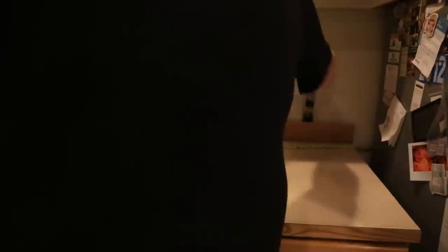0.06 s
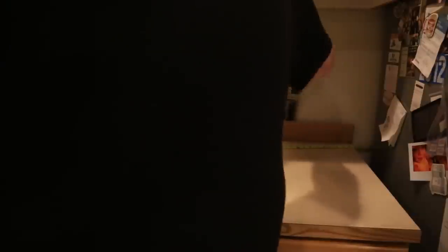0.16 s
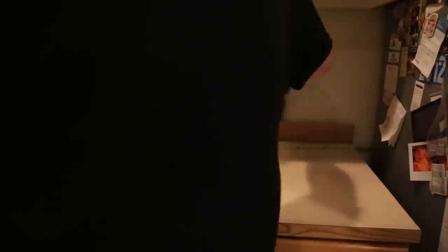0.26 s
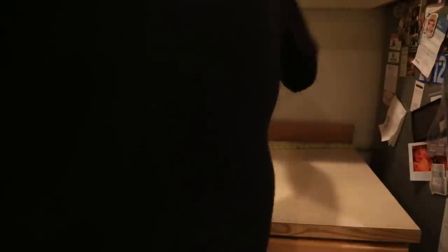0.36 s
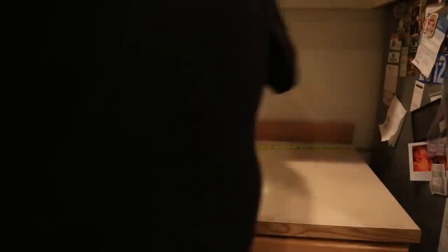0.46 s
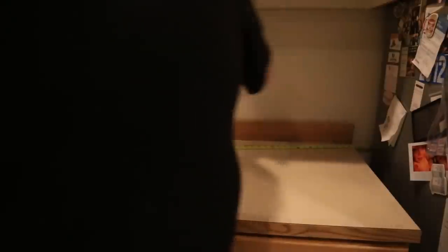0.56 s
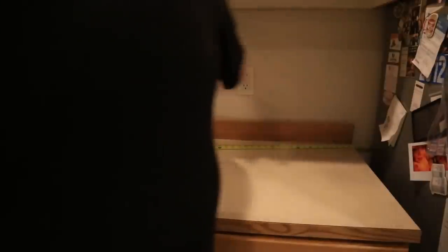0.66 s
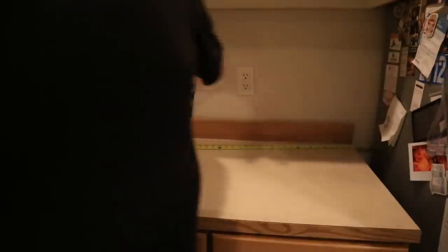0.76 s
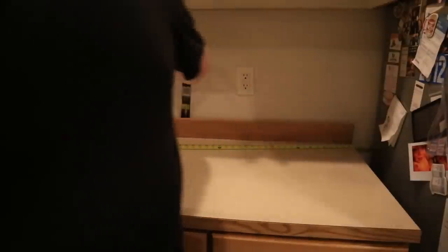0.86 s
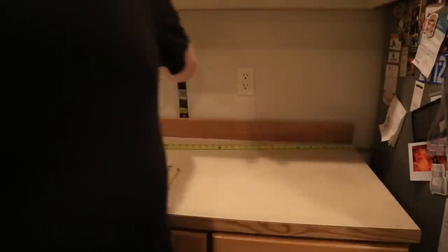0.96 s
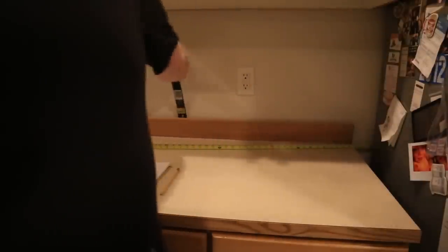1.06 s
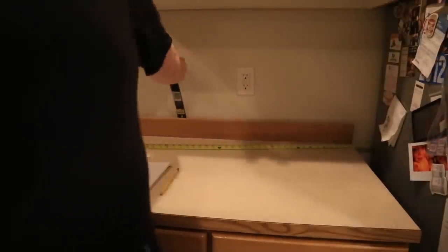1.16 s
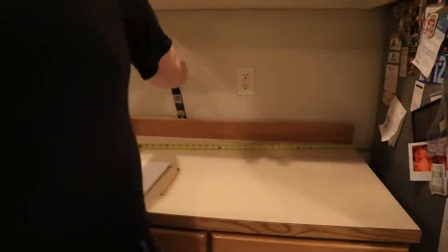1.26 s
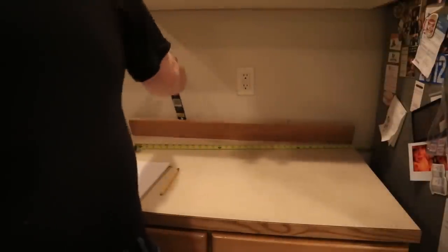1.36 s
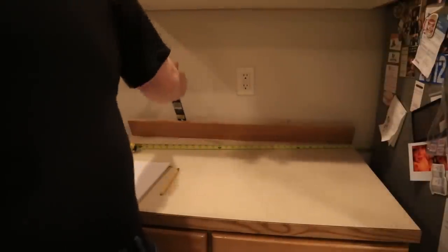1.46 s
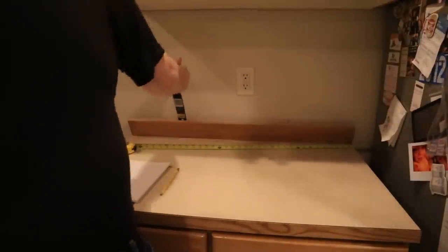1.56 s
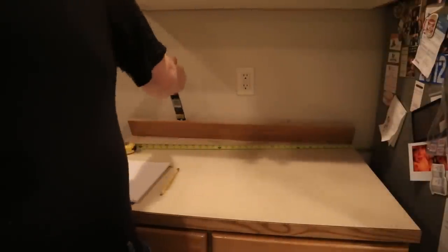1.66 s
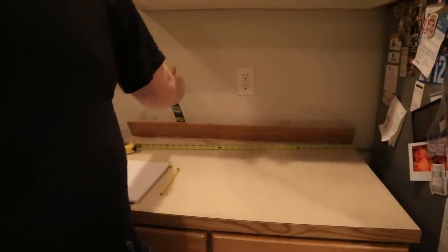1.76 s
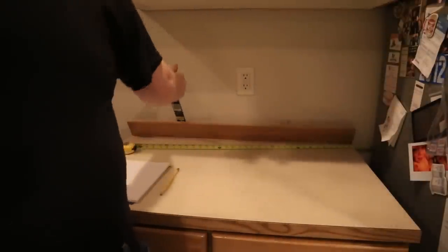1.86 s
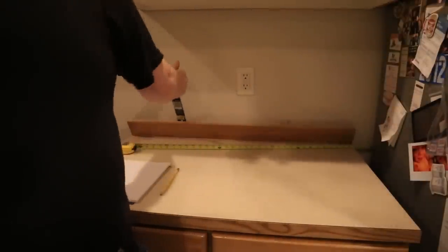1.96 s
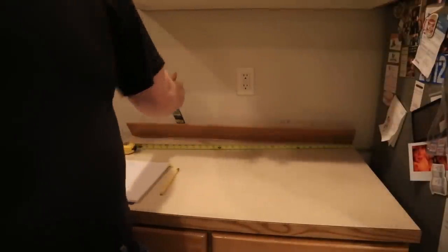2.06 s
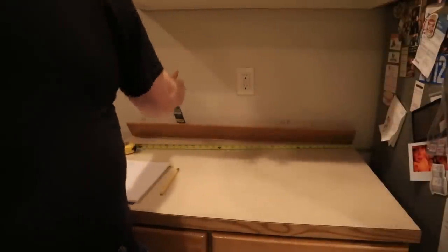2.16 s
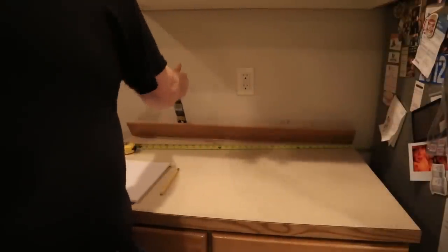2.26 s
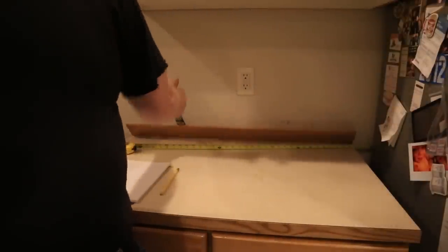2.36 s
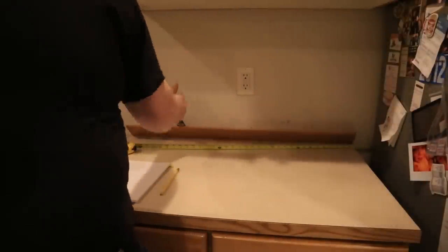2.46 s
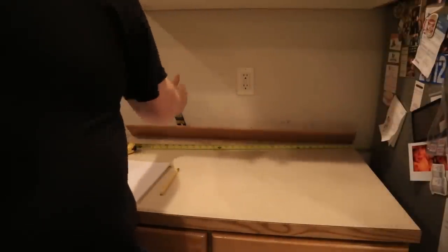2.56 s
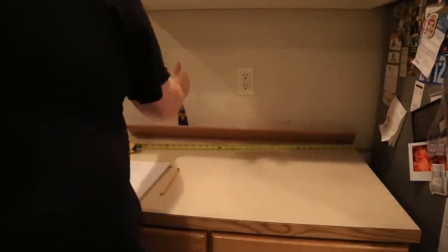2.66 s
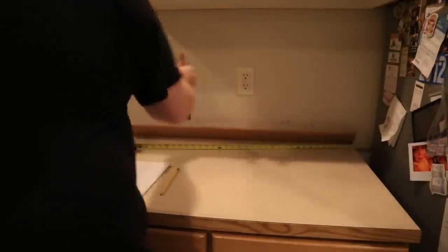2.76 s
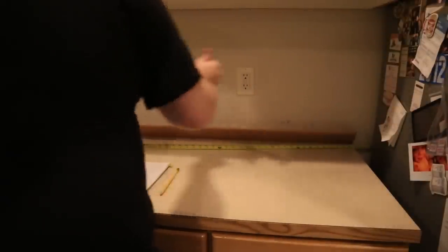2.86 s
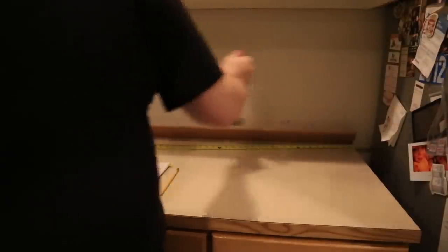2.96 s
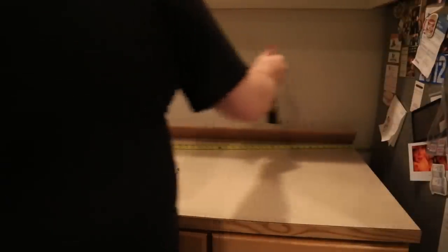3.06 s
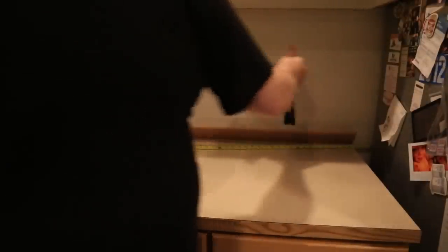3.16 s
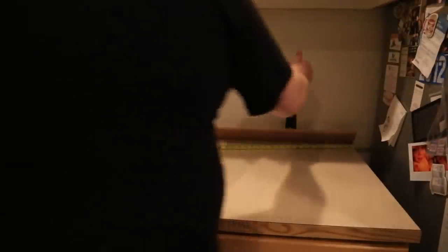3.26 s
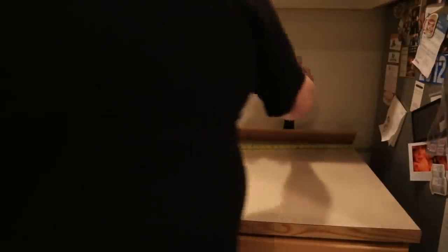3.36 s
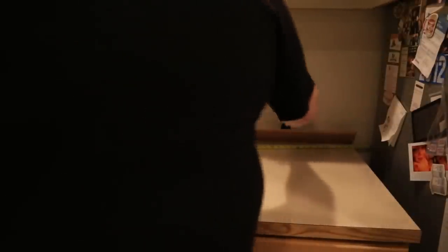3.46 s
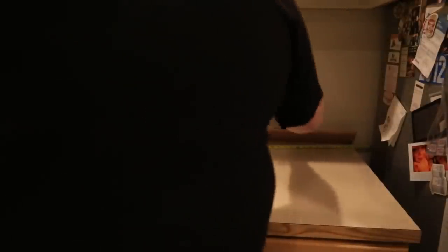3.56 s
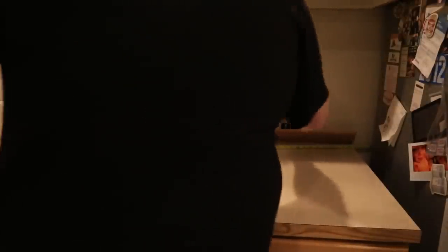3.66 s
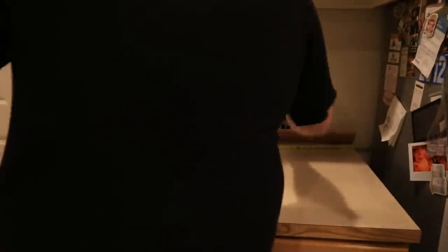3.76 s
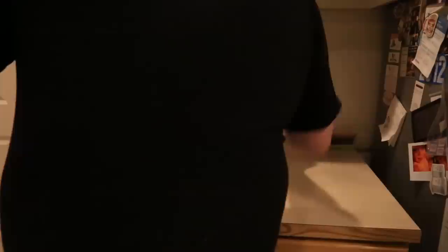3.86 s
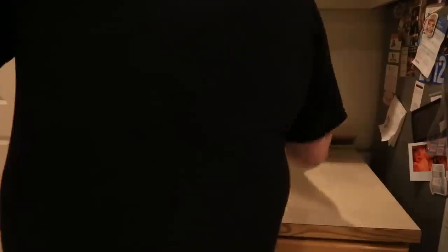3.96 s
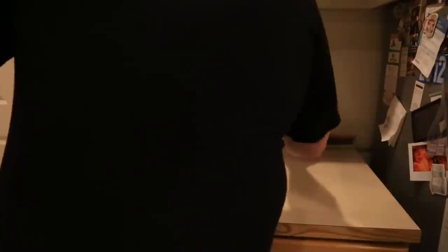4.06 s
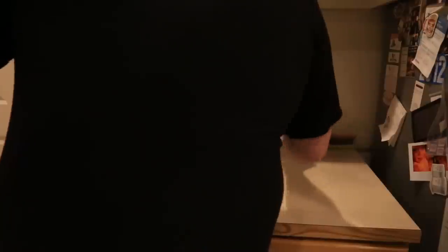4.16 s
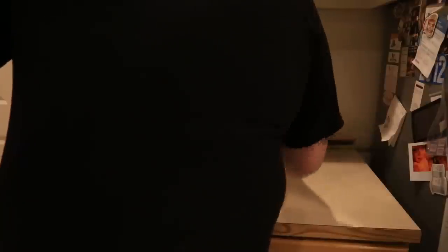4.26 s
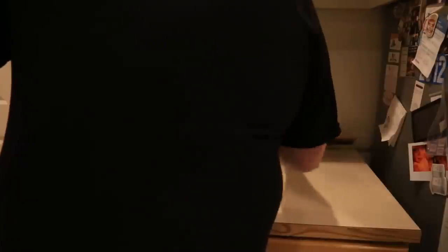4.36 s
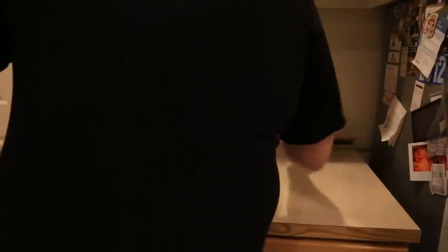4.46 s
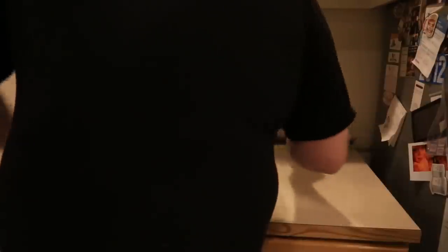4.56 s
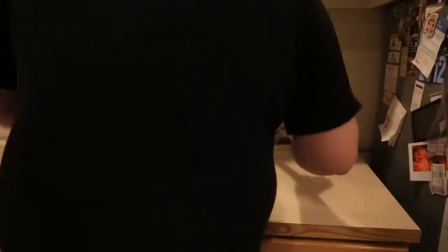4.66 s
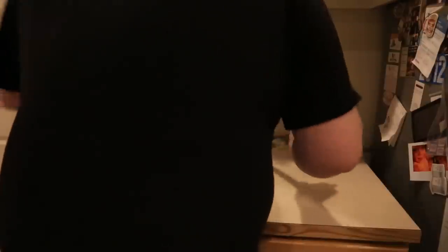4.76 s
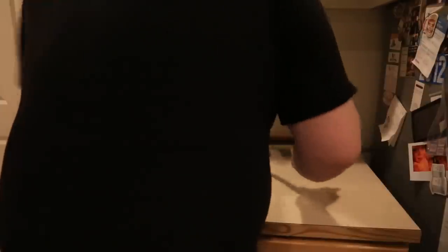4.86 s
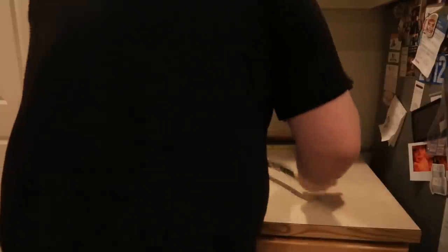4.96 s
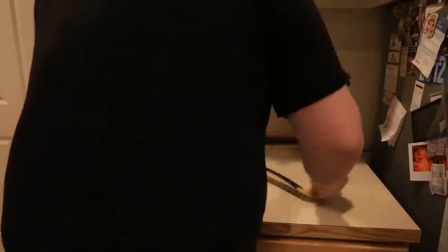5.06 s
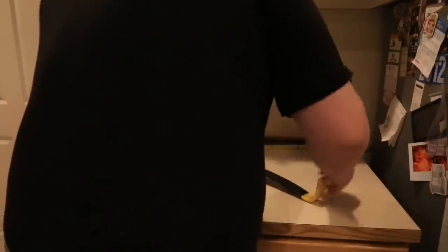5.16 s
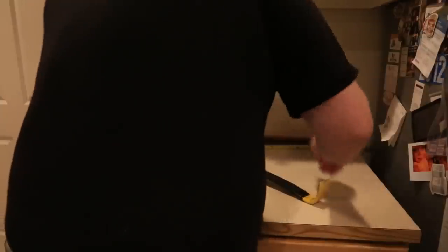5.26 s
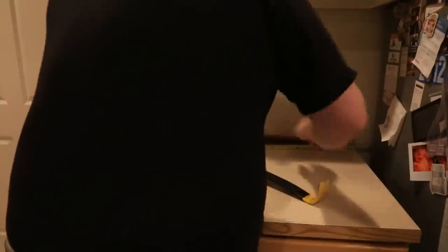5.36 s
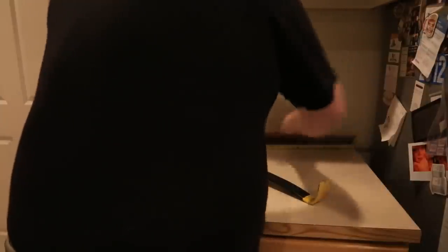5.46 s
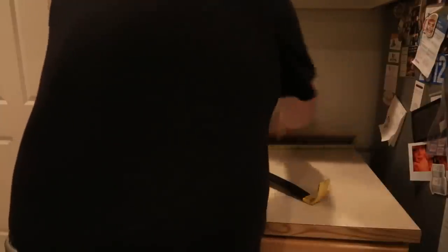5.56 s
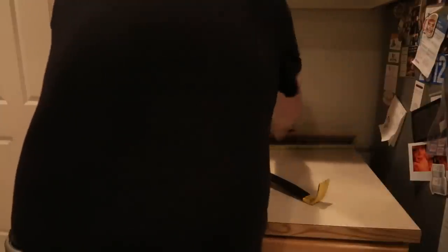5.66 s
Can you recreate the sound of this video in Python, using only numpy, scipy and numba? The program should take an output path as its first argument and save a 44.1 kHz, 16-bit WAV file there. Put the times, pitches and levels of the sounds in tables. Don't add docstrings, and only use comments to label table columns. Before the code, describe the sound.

Close, dry and rough: dull woody knocks with hollow wall thumps and short gritty scrapes, then sudden hard metal-on-wood cracks that buzz briefly around the middle pitches. After a few more pries, one tool thuds on the counter, and another lands with a loud ringing clank and quick rebounds. Small room, short echo, faint hum and rumble, camera nearby, loud peaks clipping.

```python
import sys
import numpy as np
from scipy import signal
from scipy.fft import rfft, irfft, next_fast_len
from scipy.io import wavfile
from scipy.ndimage import uniform_filter1d
from numba import njit

SR = 44100
rng = np.random.default_rng(int(sys.argv[2]) if len(sys.argv) > 2 else 0)


def boost(x):
    u = np.asarray(x, float) / 20
    return 10 ** u


def store_wav(level_fs):
    pcm = np.round(np.clip(np.atleast_2d(level_fs), -1, 1) * 32767)
    wavfile.write(sys.argv[1], SR, pcm.T.astype(np.int16))


N = 251811


def unit(x):
    return x / np.sqrt(np.mean(x ** 2))


def band(x, lo_hz, hi_hz):
    return signal.sosfilt(signal.butter(2, [lo_hz, min(hi_hz, .45 * SR)], "band", fs=SR, output="sos"), x)


def smooth_noise(size, window, passes=1):
    x = rng.standard_normal(size)
    for _ in range(passes):
        x = uniform_filter1d(x, window)
    return unit(x)


def fade(t60, length):
    t = np.arange(int(length * SR)) / SR
    return t, np.exp(-np.log(1000) * t / t60)


@njit
def modes(pole, gain, size):
    out = np.zeros(size)
    for k in range(len(pole)):
        z = gain[k] + 0j
        for i in range(size):
            out[i] += z.imag
            z *= pole[k]
    return out


def ring(hz, gain, t60, rise):
    size = int(min(max(t60), .6) * SR)
    x = modes(np.exp((2j * np.pi * hz - np.log(1000) / t60) / SR), gain, size)
    x = x * (1 - np.exp(-np.arange(size) / SR / rise))
    return x / np.abs(x).max()


def add(out, s, x):
    i = int(s * SR)
    out[i:i + len(x)] += x[:N - i]


def floor():
    # pitch in Hz, level in dB per Hz.
    background = [(56, -29.5), (95, -5.5), (108, 1.5), (320, -11.5), (388, -7), (441, -16.5), (594, -16.5),
                  (950, -24.5), (1520, -24), (1920, -29), (15500, -38.5)]
    size = next_fast_len(N)
    f = np.maximum(np.fft.rfftfreq(size, 1 / SR), 1)
    hz, db = np.transpose(background)
    colour = boost(np.interp(np.log(f), np.log(hz), db))
    apart = np.clip(f / 5500, 0, 1.05)
    noise = rfft(rng.standard_normal((2, size)))
    mid, side = irfft(noise * [colour, colour * apart], size)[:, :N]
    gain = boost(-48.5) / np.sqrt(np.mean(mid ** 2))
    flutter = boost(1.2 * smooth_noise(N, 6000))
    hum = boost(-41) * np.sin(2 * np.pi * 59.8 * np.arange(N) / SR)
    return gain * (mid * flutter + side * np.array([[1], [-1]])) + hum


def room(x):
    # middle pitch in Hz, t60 in seconds, level in dB.
    tail_bands = [(125, 0.33, -9.5), (480, 0.33, -10), (1500, 0.24, -4.5), (3930, 0.24, -6.5),
                  (10510, 0.18, -1)]
    tail = np.zeros((2, int(.45 * SR)))
    for hz, t60, db in tail_bands:
        t, decay = fade(t60, .45)
        part = band(rng.standard_normal(tail.shape), hz / 1.675, hz * 1.7) * decay * (1 - np.exp(-t / 0.004))
        tail += boost(db) * part * np.sqrt(14 / t60 / SR)
    mid, other = signal.oaconvolve(x[None], tail, axes=1)[:, :N]
    side = 0.12 * np.diff(other, prepend=0)
    return np.array([mid + side, mid - side])


def thumps():
    # start in seconds, peak in dB, pitch in Hz.
    wall = [(0.131, -24.5, 141), (0.183, -10.5, 159.5), (0.395, -25.5, 169), (0.725, -15, 147.7),
            (0.796, -14, 126), (0.87, -21, 139.5), (0.994, -15, 125), (1.204, -30.5, 116.6),
            (1.255, -33.5, 151), (1.58, -16.5, 140.2), (1.629, -34, 139), (1.77, -20, 125),
            (2.08, -14.5, 128.8), (2.121, -35, 127), (2.217, -19.5, 136.4), (2.401, -21, 117.4),
            (2.46, -31, 106.5), (2.539, -27, 125), (2.569, -29, 138), (3.559, -7.5, 121.6),
            (3.586, -38, 136), (3.915, -16.5, 117.4), (3.962, -33, 132), (4.25, -15, 135),
            (4.391, -15, 130.6)]
    # start in seconds, peak in dB, pitch in Hz.
    cabinet = [
        (4.752, -6.5, 112),
        (4.843, -7.5, 119.2),
        (4.938, -18.5, 186.7),
        (5.147, -22, 140.6),
        (5.198, -11, 120.1),
        (5.261, -13.5, 115),
        (5.302, -18, 118.5),
        (5.328, -21, 103),
    ]
    out = np.zeros(N)
    for s, db, hz, t60 in [(*row, 0.13) for row in wall] + [(*row, 0.12) for row in cabinet]:
        c = rng.random((2, 4))
        ratio = np.append(1, np.array([.8, 1.25, 1.6, 2.1]) * (.93 + .14 * c[0]))
        decay = t60 * np.array([0.77, 1.2, 1.35, 1.18, 1.02])
        add(out, s, boost(db + 2.5) * ring(hz * ratio, np.append(1, 0.35 * c[1]), decay, 0.014))
    return out


def scrapes():
    # pitch in Hz, width in Hz, level in dB.
    rub = [(1049, 134, 8.5), (1410, 76, -1.5), (1634, 4.9, -8.5), (1865, 137, -5), (2936, 44, -4),
           (3213, 65, -7.5), (3760, 300, -5.5)]
    # start in seconds, length in seconds,
    # level at start in dB, level at end in dB, grit in dB (a higher value adds more grit, mixed in upside
    drags = [(0.039, 0.11, -53.5, -31, -8.5), (0.124, .055, -30, -31, -19), (0.792, 0.079, -33, -25.5, -38),
             (0.842, 0.17, -37.5, -22.5, -17), (1.141, 0.12, -48, -52.5, -7), (1.268, 0.23, -41, -38, -7.5),
             (1.541, 0.032, -61, -30, -3.5), (2.011, 0.054, -54, -54, -3.5),
             (2.622, 0.064, -59.5, -28.5, -31), (3.746, 0.13, -55.5, -50.5, -10),
             (4.148, 0.058, -53, -57, -17), (4.422, 0.056, -36.5, -26.5, -17),
             (4.597, 0.15, -54.5, -51.5, -10.5), (4.861, 0.1, -20.5, -25.5, -17),
             (5.1, 0.093, -52.5, -30, -12.5), (5.453, 0.057, -44, -37, -28)]
    # start in seconds, level in dB, t60 in seconds, grit in dB, rumble in dB.
    settles = [(.2, -34.5, 0.51, -10, 8.5), (0.407, -19.5, 0.28, -12.5, -0.5), (1.006, -30, 0.31, -25.5, 5),
               (1.575, -28.5, 0.19, -27.5, 5.5), (1.82, -33.5, 0.506, -15, -3.5),
               (2.13, -33.5, 0.52, -18, 0.5), (2.42, -37, 0.57, -6.5, 5), (2.694, -18.5, 0.057, -18, -14.5),
               (3.556, -18, 0.23, -19, 10.5), (3.97, -18, 0.28, -8.5, -5.5), (4.272, -23.5, 0.28, 0, -1),
               (4.475, -32, 0.31, -15, -3.5), (4.78, -15, .14, -18, 7), (4.959, -26.5, 0.36, -32, 9.5),
               (5.215, -11.5, 0.46, -12, 4.5), (5.35, -19.5, 0.2, -13.5, 5.5), (5.505, -45, 0.096, -35, -2),
               (5.594, -49, 0.16, -25, -1)]
    # start in seconds, length in seconds, level in dB, pitch in Hz, width in Hz.
    rasps = [(0.85, 0.074, -42.5, 3160, 400), (0.848, 0.08, -48, 4700, 900),
             (1.275, 0.26, -47.5, 1073, 120.4), (1.282, 0.11, -45, 1656, 150),
             (1.285, 0.22, -48.5, 3110, 295), (1.32, 0.13, -54.5, 3950, 400),
             (4.267, 0.073, -43, 4660, 910), (4.87, 0.18, -28, 436, 200), (5.05, 0.37, -37, 414, 160),
             (4.892, 0.085, -40, 2830, 600), (5.471, 0.067, -41, 1080, 300), (5.576, .05, -47.5, 1004, 297),
             (0.862, 0.23, -46.5, 1500, 200), (2.429, 0.053, -49, 9920, 8940),
             (2.642, 0.071, -36, 1130, 498), (3.933, 0.04, -52.5, 11900, 7000),
             (4.278, 0.063, -48, 12000, 7000), (4.6, .13, -57.5, 1160, 198), (4.76, 0.043, -17, 354, 149),
             (4.917, .11, -23, 185, 50), (4.843, 0.063, -19, 318, 100)]

    jerks = boost(1.78 * rng.exponential(size=N // 8 + 1)).repeat(8)[:N]
    slips = rng.standard_normal(N) * jerks
    patchy = boost(1.4 * smooth_noise(N, 400))
    body = 1.54 * slips
    for hz, width, db in rub:
        body = body + boost(db) * band(slips, hz - 1.8 * width, hz + 2.0 * width) * np.sqrt(600 / width)
    mid = unit(band(body, 1097, 2450))
    grit = unit(band(slips + .25 * body, 1830, 5700) + 0.098 * band(slips, 3000, 10500))
    rumble = unit(band(slips, 213, 381) + 0.81 * band(slips, 320, 536))

    moves = [(*row, -2) for row in drags]
    for s, db, t60, grit_db, rumble_db in settles:
        moves.append((s, t60, db, db - 60, grit_db, rumble_db))
    out = np.zeros(N)
    for s, length, start_db, end_db, grit_db, rumble_db in moves:
        i = np.arange(int(s * SR), min(int((s + length) * SR), N))
        t = i / SR - s
        edge = np.clip(np.minimum(t, length - t) / 0.0037, 0, 1)
        mix = mid[i] - boost(grit_db) * grit[i] + boost(rumble_db) * rumble[i]
        out[i] += edge * boost(start_db + (end_db - start_db) * t / length - 5.0) * mix

    t = np.arange(N) / SR
    for s, length, db, hz, width in rasps:
        edge = np.clip(np.minimum(t - s, s + length - t) / 0.02, 0, 1)
        out += boost(db) * edge * unit(band(slips, hz - width / 2, hz + width / 2))
    return out * patchy


def rattles():
    # start in seconds, level in dB, pitch in Hz, width in Hz, t60 in seconds.
    smears = [(1.799, -30, 5600, 200, .3), (1.799, -37, 4870, 160, .3), (1.8, -42, 6400, 200, .25),
              (1.797, -42, 7150, 200, .1), (.997, -28, 1500, 170, .25), (1.0, -33, 2000, 150, .12),
              (1.794, -44, 12500, 6000, .05), (2.107, -42, 12000, 7000, .07), (2.11, -36, 6000, 1800, .2),
              (2.452, -40, 6200, 3000, .13), (3.546, -29, 2050, 450, .3), (4.25, -17, 1550, 500, .13),
              (1.31, -58, 11000, 4000, .3)]
    out, noise = np.zeros(N), rng.standard_normal(SR)
    for s, db, hz, width, t60 in smears:
        t, decay = fade(t60, t60)
        tone = unit(band(noise, hz - width / 2, hz + width / 2))[-len(t):]
        add(out, s, boost(db) * tone * decay * (1 - np.exp(-t / 0.0027)))
    return out


def sings():
    # start in seconds, length in seconds, level in dB.
    free_spells = [(4.006, 0.017, -21), (4.032, 0.011, -21.5), (4.077, 0.025, -29.5), (4.162, .036, -41.5),
                   (4.865, .08, -59.5), (4.938, 0.12, -47.5), (4.974, .025, -50), (4.989, 0.043, -40.5),
                   (5.085, .1, -59.5), (5.13, .06, -59), (5.13, .06, -56), (5.21, 0.084, -37),
                   (5.218, 0.041, -19), (5.222, .078, -21.5), (5.222, .04, -24), (5.265, .11, -33.5),
                   (5.268, .045, -19.5), (5.27, .022, -31.5), (5.291, .04, -48.5), (5.341, 0.077, -24.5),
                   (5.343, 0.046, -25), (5.36, .035, -51), (5.301, .075, -8.5), (5.43, 0.037, -45.5),
                   (1.795, 0.012, -5.5), (2.34, 0.039, -47), (5.59, 0.092, -64), (2.121, 0.019, -4.5),
                   (2.181, 0.067, -39), (2.201, 0.029, -28.5), (2.269, 0.055, -38), (4.76, 0.245, -51.5),
                   (5.199, 0.055, -37.5), (5.222, .075, -46), (5.233, .027, -41.5), (5.211, 0.08, -60.5),
                   (5.269, .06, -41.5), (5.31, 0.097, -56), (5.374, 0.083, -53), (5.44, 0.15, -48),
                   (5.63, 0.046, -58.5), (5.226, .09, -57), (5.21, .1, -59.5), (5.299, 0.086, -57),
                   (4.995, .02, -54), (4.767, .06, -51), (5.141, .05, -56), (.93, .05, -58),
                   (4.46, .06, -56)]
    sing_hz = [1017, 1017, 1017, 1017, 6370, 3558, 5367, 1857, 5100, 3967, 2132, 8096, 6379, 2896, 5122,
               6858, 3978, 5367, 8942, 5122, 3978, 5367, 103, 6858, 1040, 985, 5127, 1000, 1066, 945, 965,
               11579, 7391, 10783, 9959, 15224, 7391, 11579, 8936, 5127, 5127, 12780, 13954, 9964, 5100,
               5351, 2918, 5500, 5370]
    out, rock = np.zeros(N), smooth_noise(N, 300, passes=2)
    for k, ((s, length, db), hz) in enumerate(zip(free_spells, sing_hz)):
        t = np.arange(int((length + .15) * SR)) / SR
        catch_t60 = 0.1 if hz > 1500 else 0.05
        loss_db = 38 * t + 60 * np.maximum(t - length, 0) / catch_t60
        if hz > 1500:
            loss_db = loss_db + 3.5 * rock[4000 * k:][:len(t)]
        add(out, s, boost(db - loss_db) * (1 - np.exp(-t / 0.0039)) * np.sin(2 * np.pi * hz * t))
    return out


def lone_rings():
    # start in seconds, peak in dB, pitch in Hz, t60 in seconds.
    wedge = [(0.189, -14.5, 501, 0.15), (1.797, -3, 1003, 0.061), (1.8, -11.5, 875, 0.1),
             (1.802, -19, 967, 0.086), (2.12, -26, 1003, 0.26), (2.121, -32, 963, 0.42),
             (2.12, -18.5, 897, 0.25), (2.401, -5.5, 920, 0.012), (2.402, -7.5, 1130, 0.018),
             (2.406, -12, 321, 0.049), (2.69, -35.5, 294, 0.27), (3.544, -3.5, 1214, 0.031),
             (3.549, -24, 1317, 0.33), (3.914, -10, 1160, 0.021), (3.97, -13, 1018, 0.2),
             (4.25, -8.5, 1123, 0.028)]
    # start in seconds, peak in dB, pitch in Hz, t60 in seconds.
    countertop = [
        (4.759, -8.5, 99.4, .12),
        (4.76, -10, 499.6, 0.28),
        (4.845, -15.5, 506.7, 0.29),
        (4.843, -18.5, 363.2, 0.47),
        (4.97, -33.5, 432, 0.47),
        (5.03, -32, 390.4, 0.62),
        (5.061, -33, 469, 0.89),
        (5.203, -0.5, 105.4, 0.14),
        (5.262, -4, 105.7, 0.12),
    ]
    # start in seconds, peak in dB, pitch in Hz, t60 in seconds.
    high_steel = [
        (.186, -55, 11660, .18),
        (.185, -42, 3910, .07),
        (5.33, -22, 1890, .22),
        (5.36, -42, 3150, .55),
        (5.52, -63, 3150, 3.),
        (5.53, -62, 2590, 2.),
        (5.47, -56, 3978, .4),
    ]
    out = np.zeros(N)
    waver = smooth_noise(N + SR, 500, passes=2)
    for s, db, hz, t60 in [*wedge, *countertop, *high_steel]:
        tone = ring(np.array([1. * hz]), np.ones(1), np.array([t60]), 0.00035)
        own = waver[int(s * SR + 20 * round(hz, -2)) % N:][:len(tone)]
        depth = (hz > 150) * (0.71 if hz < 2400 else .5)
        add(out, s, boost(db) * tone * (1 + depth * own))
    return out


def hums():
    # start in seconds, peak in dB, pitch in Hz, t60 in seconds.
    wedged = [
        (1.769, -8.5, 966, 0.042),
        (1.797, -2, 944, 0.061),
        (2.108, 4.5, 1015, 0.068),
        (2.12, -1, 964, 0.12),
        (3.959, -6.5, 917, 0.043),
    ]
    # pitch ratio, level in dB.
    bar_modes = [(.9, 1), (.96, -23), (0.999, 26.5), (1.035, -33), (1.09, -21)]
    out, (ratio, mode_db) = np.zeros(N), np.transpose(bar_modes)
    for s, db, hz, t60 in wedged:
        c = rng.standard_normal((2, len(ratio)))
        decay = t60 * (0.5 + 0.012 * (mode_db.max() - mode_db))
        pitches = hz * ratio * (1 + 0.0034 * c[0])
        add(out, s, boost(db + 2.5) * ring(pitches, boost(mode_db + 7.5 * c[1]), decay, 0.0023))
    return out


def snaps():
    # start in seconds, peak in dB, pitch in Hz, t60 in seconds.
    hits = [(.788, -26, 1500, 0.036), (.826, -35, 1310, .03), (0.853, -17, 1500, .03),
            (.98, -29, 3450, .02), (0.995, -16.5, 3530, 0.014), (1.257, -17.5, 3250, 0.0093),
            (1.769, -3, 995, 0.018), (3.544, -6.5, 1247, 0.027), (3.556, -15.5, 1250, .03),
            (3.913, 0, 1060, 0.013), (3.917, -5.5, 1140, .015), (3.984, -25.5, 4530, 0.016),
            (4.248, -19, 4310, 0.017), (4.252, -0.5, 1100, 0.0098), (4.272, -23, 4500, .02),
            (4.281, -19.5, 4670, .02), (4.3045, -11, 4440, 0.014), (4.312, -15, 4830, 0.013),
            (5.202, 2, 2076, 0.018), (5.265, -5.5, 1950, 0.034), (5.285, -14, 2080, 0.033),
            (5.302, -11, 1950, .03), (5.326, -8.5, 1970, 0.056), (.186, -30, 3810, .02),
            (.207, -25, 3700, 0.015), (0.395, -24, 3730, .02), (2.076, -3.5, 896, 0.028),
            (2.453, -25.5, 4450, 0.021), (2.692, -17.5, 1132, 0.035), (4.396, -11.5, 1167, 0.029),
            (4.453, -21, 1085, 0.063), (4.477, -19.5, 1055, 0.037), (2.109, -21, 4780, 0.027),
            (2.11, -25, 6280, .03), (2.122, -28, 4850, 0.027), (3.959, -22.5, 5500, 0.034),
            (0.996, -25.5, 4300, .02), (3.962, -9, 1500, 0.04), (2.024, -46, 4300, .03)]
    # pitch ratio, level in dB.
    close_modes = [(.9, -5.5), (1., 3.5), (1.13, -6.5)]
    out, (ratio, mode_db) = np.zeros(N), np.transpose(close_modes)
    for s, db, hz, t60 in hits:
        add(out, s, boost(db) * ring(hz * ratio, boost(mode_db), np.full(len(ratio), t60), 0.00038))
    return out


def clanks():
    # start in seconds, peak in dB, ring time left by the grip as a share of free ringing.
    strikes = [
        (4.754, -30, 0.8),
        (4.844, -37, 1),
        (5.201, -6.5, 1),
        (5.262, -11.5, 0.58),
        (5.285, -13, 0.88),
        (5.304, -22, 0.37),
        (5.329, -22, 0.51),
        (5.349, -24.5, 0.48),
        (5.388, -21, 0.4),
        (5.443, -33.5, 0.71),
    ]
    # pitch in Hz, level in dB, t60 in seconds.
    steel = [(1873, -13, 0.65), (2148, -4, 0.35), (2584, -16, 0.47), (2896, 0, 0.34), (2982, -27, 1.4),
             (3537, -17, 0.5), (3978, -3, 0.46), (4285, -16, 0.31), (4490, -25, 0.41), (5120, -18, 1.3),
             (5367, -9, 0.31), (6379, -2, 0.24), (6858, -7, 0.43), (7391, -18, 0.31), (8096, -17, 0.5),
             (8570, -30, 0.44), (8942, -26, 0.51), (9362, -31, 0.46), (9964, -32, 0.5), (10780, -18, 0.21),
             (11580, -78, 5.0), (11840, -23, 0.14), (12780, -37, 0.36), (13950, -50, 0.56),
             (14180, -51, 0.71), (15220, -29, 0.15)]
    further_db = [-1.5, 1.5, 7, 1.5, -1, 3.5, 1.5, 2, 3.5, 3.5, -1, -3.5, -4, -3, -2, 3, 2, 5, 3, -6, -1,
                  -1.5, 2, 12.5, 2, -4]
    out, (hz, mode_db, t60) = np.zeros(N), np.transpose(steel)
    mode_db = mode_db + further_db + 2.5 * np.log2(hz)
    ring_time = np.clip(t60, .18, .5) * np.minimum(1, (7000 / hz) ** .8)
    for s, db, free in strikes:
        gain = boost(mode_db + 2.5 * rng.standard_normal(len(hz)))
        add(out, s, boost(db) * ring(hz, gain, free * ring_time, 0.000304))
    return out


def knocks():
    # start in seconds, knock peak in dB, board level in dB, board pitch in Hz, crack in dB.
    board_blows = [(0.184, -12.5, -14.5, 494, -29.5), (0.394, -10, -24.5, 401, -29.5),
                   (0.726, -22.5, -10, 283, -34.5), (0.824, -17.5, -53, 261, -48),
                   (0.95, -35, -24.5, 267, -47.5), (1.56, -21.5, -34, 241, -49),
                   (1.574, -16, -19.5, 320.4, -49.5), (1.769, -1.5, -17.5, 373, -27.5),
                   (1.797, -3, -16.5, 620, -14), (2.076, -4.5, -15, 350, -23.5),
                   (2.108, 2, -31, 740, -19.5), (2.401, -3.5, -10, 642, -44), (2.555, -28, -32.5, 313, -56),
                   (2.657, -36, -53.5, 318.5, -44), (3.544, -4, -7.5, 457.6, -24),
                   (3.913, -2, -12.5, 631, -18), (3.959, 0.5, -19.5, 532, -14),
                   (4.248, -0.5, -12.5, 642, -19.5), (4.271, -38.5, -27, 282, -31),
                   (4.304, -28, -29.5, 575, -21), (4.395, -12, -16, 495, -24.5),
                   (4.453, -28, -46, 416, -32)]
    # start in seconds, knock peak in dB, board level in dB, crack in dB.
    ticks = [(0.788, -8.5, -21, -29.5), (0.848, -17, -30, -35), (0.996, -12.5, -20, -27),
             (1.202, -41, -35.5, -53), (1.256, -15.5, -41, -24), (2.024, -43, -51, -53.5),
             (2.454, -44, -41, -28), (2.671, -27, -39, -39), (2.692, -28, -51, -36.5),
             (3.826, -27, -47, -57), (4.011, -20, -37, -50), (4.476, -22, -43, -31)]
    # start in seconds, knock peak in dB, top level in dB, top pitch in Hz, crack in dB.
    drops = [
        (4.753, 3, -5.5, 438.6, -13.5),
        (4.842, -5, -8.5, 421.6, -28),
        (5.195, -2.5, -4, 378, -17.5),
        (5.202, 7.5, -0.5, 565, -8),
        (5.262, 3.5, -7, 487, -22),
        (5.284, -4, -15.5, 341, -21.5),
        (5.302, -4, -6, 341.7, -23),
        (5.327, -4.5, -15, 346, -20.5),
        (5.349, -11, -18, 306, -34),
    ]
    out, noise = np.zeros(N), rng.standard_normal(N + SR)
    noise = unit(band(noise, 1560, 4570) + 0.019 * band(noise, 3300, 13000))
    blows = [(*row, 0.072) for row in board_blows] + [(*row, 0.098) for row in drops]
    blows += [(s, knock, board, 326, crack, 0.036) for s, knock, board, crack in ticks]
    for s, knock_db, board_db, board_hz, crack_db, t60 in blows:
        c = rng.random((4, 20))
        hz = 640 * 5.0 ** ((np.arange(20) + c[0]) / 20)
        gain = (c[1] - .4) * hz / 1000 / (2.44 + (hz / 1300) ** 3)
        add(out, s, boost(knock_db - 3.5) * ring(hz, gain, t60 * 1100 / (300 + hz), 0.00043))
        hz = board_hz * np.append(1, 2.4 ** (c[2, :6] - .5))
        gain = np.append(1, 0.57 * c[3, :6])
        add(out, s, boost(board_db + 2.0) * ring(hz, gain, np.full(7, 1.21 * t60), 0.0014))
        t, decay = fade(0.98 * t60, .3)
        envelope = (decay + 0.5 * np.exp(-t / 0.00457)) * (1 - np.exp(-t / 0.00062))
        add(out, s, boost(crack_db - 5.5) * noise[int(s * SR):][:len(t)] * envelope)
    return out


def scene():
    work = knocks() + thumps() + hums() + clanks() + lone_rings() + snaps() + scrapes()
    work = signal.sosfilt(signal.butter(3, 88., "high", fs=SR, output="sos"), work)
    left, right = work + room(work) + floor() + sings() + rattles()
    lag = 0.9
    left = signal.lfilter([1 - lag, 1 + lag], [1 + lag, 1 - lag], left)
    return np.array([left, right])


def roll_off(x):
    return signal.sosfilt(signal.butter(12, 15780, fs=SR, output="sos"), x)


def record(dry):
    dry = signal.sosfilt(signal.butter(2, 48., "high", fs=SR, output="sos"), dry)
    mix = np.clip(dry, -1, 1)
    return roll_off(mix)


dry = scene()
out = record(dry)
store_wav(out)
```